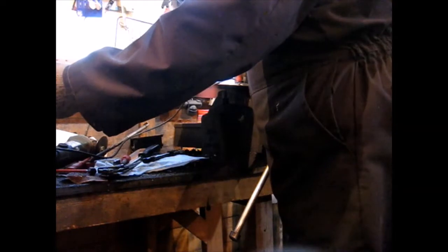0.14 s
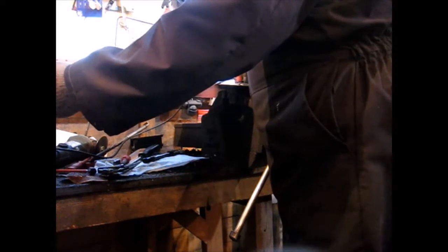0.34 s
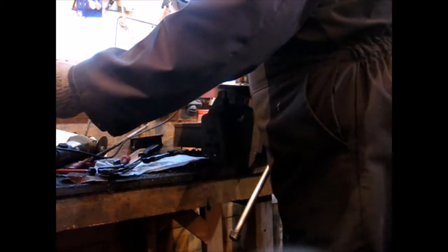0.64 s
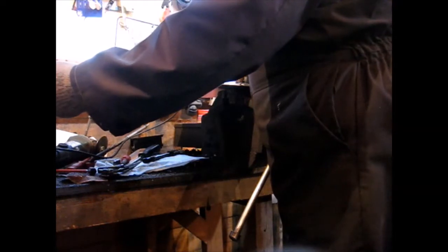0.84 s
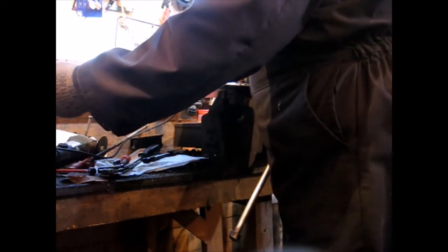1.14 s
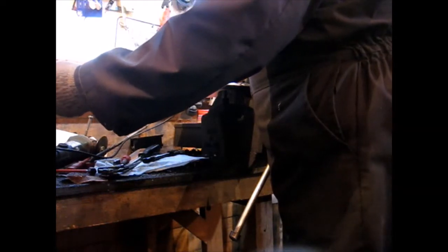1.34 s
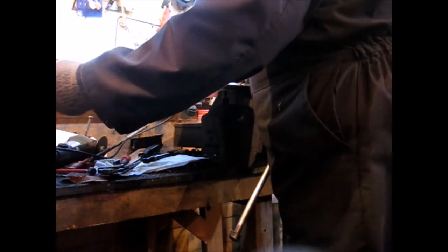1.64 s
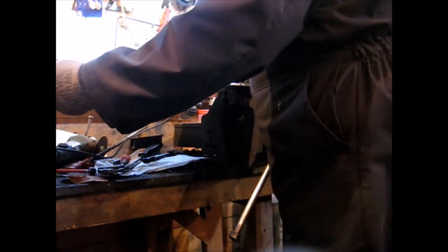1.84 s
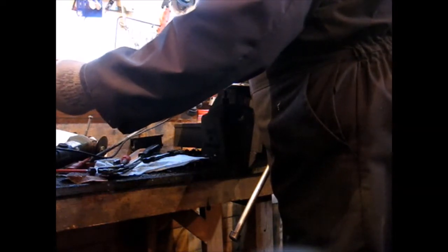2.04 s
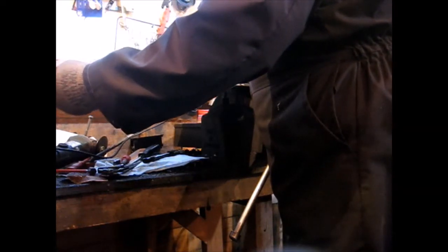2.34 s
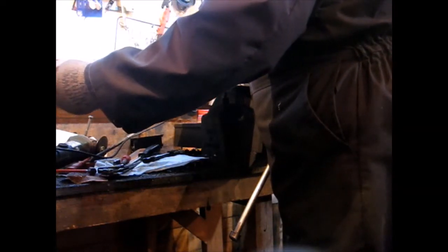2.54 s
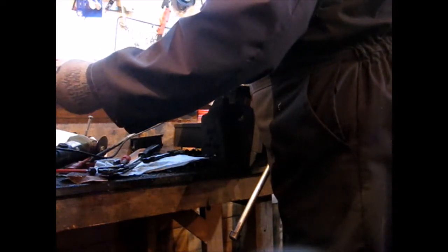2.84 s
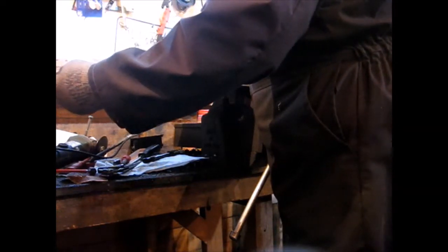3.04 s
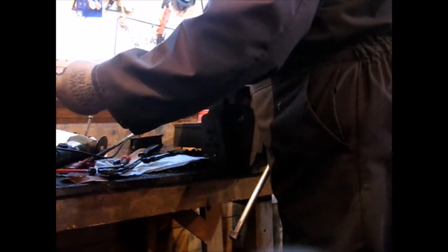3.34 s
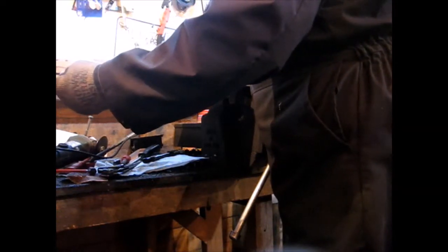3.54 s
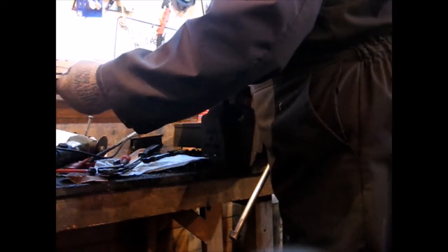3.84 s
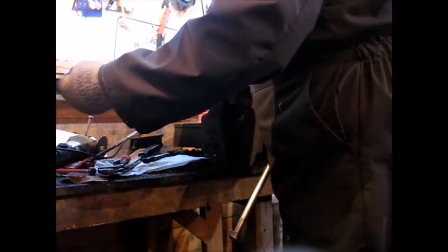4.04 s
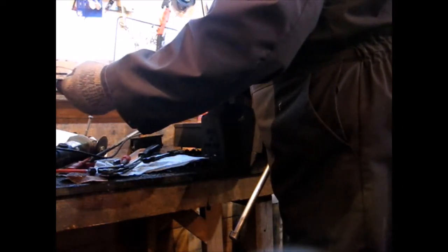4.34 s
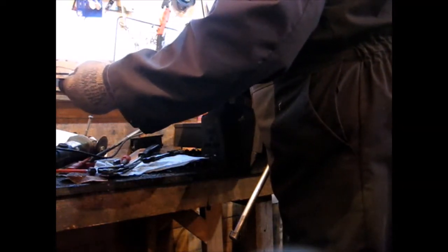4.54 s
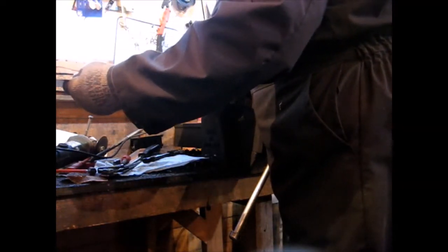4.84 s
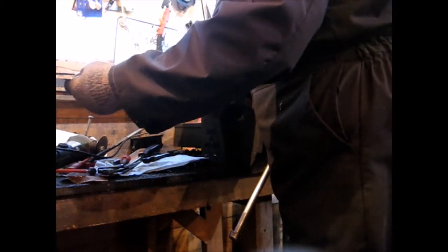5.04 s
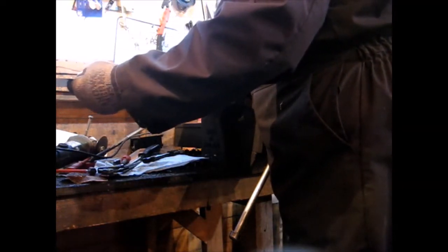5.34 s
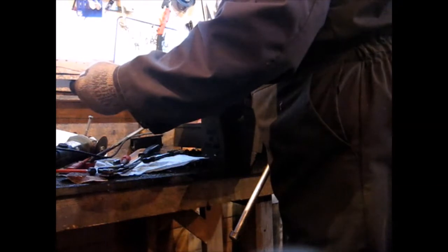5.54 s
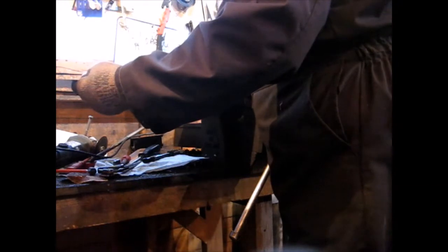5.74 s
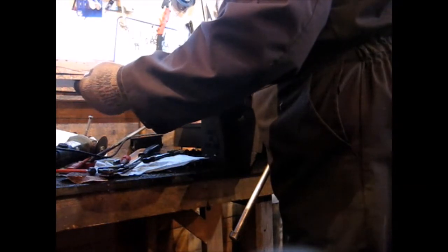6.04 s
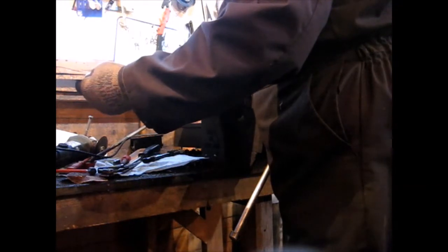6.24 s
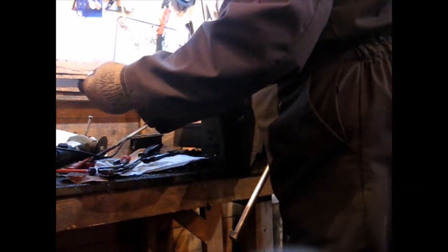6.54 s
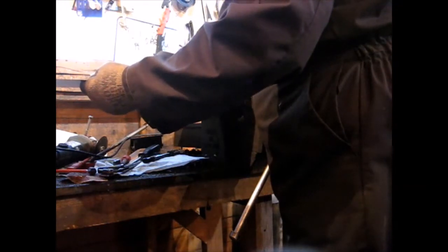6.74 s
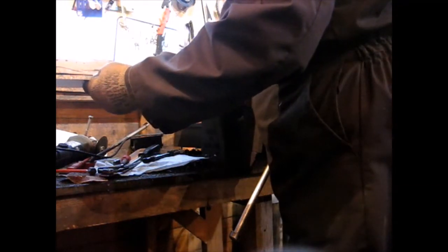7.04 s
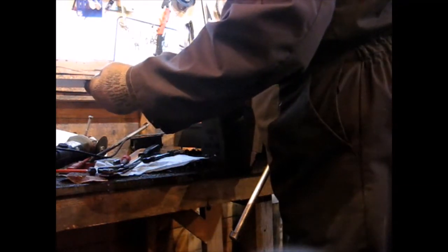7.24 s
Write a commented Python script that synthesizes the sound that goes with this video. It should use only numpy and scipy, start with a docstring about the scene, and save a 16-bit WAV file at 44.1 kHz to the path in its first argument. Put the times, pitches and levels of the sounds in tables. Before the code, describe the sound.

An electric jigsaw cuts sheet steel without stopping, heard close by in a small workshop. Its rapid strokes bite and scrape, making the metal ring brightly over a high gear whine. The motor labours and slows at first, then speeds up, and the whine rises and holds. Thin squeals come from the blade while the wooden bench rattles and hums faintly underneath.

```python
"""In a small workshop, an electric jigsaw cuts sheet steel on a wooden bench.
The motor labours, then speeds up as the push on the saw eases, and its gear whine rises with it.
On each stroke the teeth bite and make saw and sheet ring; the blade scrapes on its way back.
The blade also rasps and squeals in the slot, while the bench rattles and hums.
Now and then the noise drops away for a moment, leaving a few chirping tones."""
import sys
import numpy as np
from scipy import signal
from scipy.fft import rfft, irfft, next_fast_len
from scipy.io import wavfile
from scipy.ndimage import uniform_filter1d

SR = 44100
rng = np.random.default_rng(int(sys.argv[2]) if len(sys.argv) > 2 else 0)


def materialize(psi):
    """Save the field psi as 16-bit PCM at rate SR to the path in sys.argv[1].

    A 1-D psi becomes a single channel; in a 2-D psi each row is a channel.
    """
    bounded = np.clip(np.atleast_2d(psi).T, -1, 1)
    quanta = np.round(bounded * 32767).astype(np.int16)
    wavfile.write(sys.argv[1], SR, quanta)


N = 325892
T = np.arange(N) / SR

# How fast the motor drives the blade: time_s, strokes_per_s
STROKE_SPEED = [(0, 20.39), (.2, 19.75), (.56, 19.72), (.75, 18.77), (1.39, 18.31), (1.8, 17.15),
                (2.1, 17.92), (2.33, 19.8), (2.53, 20.6), (2.75, 21.6), (2.92, 22.4), (3.2, 22.45),
                (3.5, 22.94), (3.9, 22.73), (4.75, 22.4), (5.35, 22.72), (5.7, 22.58), (6.6, 22.69),
                (7.39, 22.97)]
# The tone colour of each noise, from low to high: pitch_hz, relative_db
BITE_COLOUR = [(200, -54), (900, -37), (1800, -33), (2300, -2), (2900, -5.5), (3500, 0), (4200, -13),
               (4900, -12.5), (7000, -32), (15000, -14.5)]
CHIP_COLOUR = [(500, -39), (2500, -24), (4500, 1), (6300, -17.5), (7800, 0), (9200, 1.5), (10200, -1.5),
               (11200, 2), (12300, -5.5), (14000, 2.5), (15800, -39)]
RASP_COLOUR = [(100, -66), (280, -62), (600, -12), (1200, -11.5), (1800, -1), (2700, 2), (3500, 4.5),
               (4700, 1.5), (5500, 1.5), (6600, 7), (7900, 2.5), (10000, -2), (14000, -5.5), (15800, -11.5)]
SCRAPE_COLOUR = [(200, -44.5), (600, -14), (900, -3), (1250, -3), (1700, -2.5), (2500, 3.5), (5000, -8),
                 (12000, -40)]
RATTLE_COLOUR = [(100, -39), (240, -30), (305, -5.5), (365, -3.5), (440, 2), (510, -2.5), (650, 2.5),
                 (850, 3.5), (1500, -0.5), (5000, -67)]
HUM_COLOUR = [(250, -30), (335, -10), (361, 0), (390, -6), (430, 3), (475, -10), (700, -13), (760, -1),
              (810, -14), (950, -30)]
ROOM_COLOUR = [(20, 0), (70, 1), (160, 3.5), (260, 4), (600, -20), (4000, -18.5)]
# The notes that saw and sheet ring at, and their relative levels in the four stages of the cut:
# pitch_hz, width_hz, stage1_db, stage2_db, stage3_db, stage4_db
STEEL_NOTES = [(1195, 43, -8, -11, -18, -16), (1277, 45, -11, -10, -9, -13), (1450, 62, -7, -13, -11, -11),
               (1634, 44, -7, -12, -13, -15), (1744, 39, -10, -7, -9, -10), (1989, 81, -6, -1, -3, -3),
               (2226, 53, -5, -6, -9, -8), (2395, 60, 2, -3, -6, -11), (2499, 33, -4, -13, -8, -6),
               (2663, 42, -2, -2, -1, -5), (2763, 34, -4, -1, -2, 0), (2927, 52, -2, -6, -4, -5),
               (3056, 57, -9, 2, -4, 1), (3112, 40, -5, -4, 2, 1), (3228, 44, 6, 0, -1, 3),
               (3384, 46, -3, -8, -2, -3), (3551, 44, 0, 3, 1, 0), (3623, 35, -10, -6, -6, -2),
               (3801, 54, -13, -1, -6, 0), (3982, 38, -8, -2, 2, 3), (4042, 45, -6, -2, 4, 4),
               (4142, 42, -4, 4, 3, 2), (4452, 54, -4, -9, -8, -11), (4633, 58, -7, -10, -9, -8),
               (5030, 41, -12, -8, -3, -4), (5103, 56, -3, -4, -5, -3), (5611, 54, -20, -15, -3, -2),
               (5768, 91, -7, -5, -4, -2), (5964, 58, -4, -6, -7, -5), (6121, 98, -6, -1, 1, 0),
               (6309, 78, -2, -4, -9, -15), (6607, 52, -11, -4, -4, -5), (6753, 50, -9, 0, -4, -5),
               (6897, 84, -5, -4, -4, 1), (7080, 69, -14, 1, -2, -5), (7191, 52, -6, -9, -7, -7),
               (7556, 59, -12, -8, -4, -2), (8411, 66, -8, -3, -5, -4), (8982, 62, -12, -6, -9, -5),
               (9235, 125, -9, -3, -12, -4)]
# When one stage blends into the next: start_s, end_s, three times in a row
STAGE_CHANGES = [2.2, 2.85, 3.9, 4.1, 5.65, 5.9]
# How much of a note's energy comes from the bite (the rest is rubbing): pitch_hz, share_0_to_1
BITE_SHARE = [(1500, .05), (2000, .55), (2400, .55), (2800, .55), (3150, .8), (4100, .87), (4900, .25),
              (7000, .15), (7600, .55), (9000, .65)]
# The tones of the gears: multiple_of_tooth_rate, loaded_db, unloaded_db
GEAR_TONES = [(2, -19, -27), (3, -12, -19), (4, 0, -9), (5, -15, -19), (6, -6, -8), (7, -9, -12),
              (8, -12, -16), (9, -10, -16)]
# The pitches that the gear case boosts: pitch_hz, width_hz, gain_db
GEAR_CASE = [(3240, 90, 0), (3550, 90, -1), (4150, 90, 3)]
# How loud the gears whine: time_s, level_db
WHINE_LEVEL = [(0.0, -37), (0.9, -34), (1.6, -34), (1.9, -31), (2.4, -31), (2.7, -33), (3.0, -32.5),
               (3.4, -36), (4.5, -40.5), (7.39, -41)]
# Squeals of the blade in the slot: start_s, length_s, pitch_hz, level_db
BLADE_SQUEALS = [(0.0, 1.25, 1186, -46), (1.0, 1.1, 1470, -47), (1.8, 1.15, 2400, -41),
                 (3.05, .75, 2768, -43), (3.25, .7, 6140, -42), (3.2, .8, 8410, -47), (4.35, .5, 5090, -47),
                 (4.5, 1.1, 1415, -49), (4.55, 1.55, 1972, -46), (5.15, .5, 5095, -41),
                 (5.6, 1.8, 2760, -45), (5.85, 1.5, 3215, -42), (6.3, 1.1, 3112, -42)]
# How hard the sheet shakes the bench: time_s, relative_db
SHEET_SHAKE = [(0.0, -59), (0.55, -56.5), (0.8, -60.5), (1.35, -55), (1.55, -58), (1.85, -55.5),
               (2.1, -58.5), (2.9, -57), (3.4, -60), (3.95, -57.5), (4.2, -61.5), (4.45, -61), (4.72, -53),
               (4.95, -56.5), (5.45, -51.5), (6.25, -53), (6.55, -57.5), (7.39, -56.5)]
# Moments when the noise drops away: time_s, depth_db
NOISE_DIPS = [(.572, 28), (.851, 28), (.905, 11), (1.225, 13), (1.31, 12), (1.437, 12), (1.76, 10),
              (2.01, 11), (2.203, 14), (2.55, 9), (2.85, 11), (2.995, 15), (3.17, 11), (3.326, 30),
              (3.698, 16), (3.847, 15), (4.082, 16), (4.19, 14), (4.255, 17), (4.402, 13), (4.468, 14),
              (4.808, 14), (4.95, 13), (5.063, 13), (5.17, 11), (5.715, 29), (5.767, 11), (5.812, 12),
              (6.066, 11), (6.13, 13), (6.972, 32), (6.995, 28), (7.25, 27)]
# How loud each noise is: base_db, extra_db_per_lost_stroke_per_s, extra_db_per_db_of_shake
BITE_RULE, RASP_RULE, SCRAPE_RULE = (-41, .14, -.21), (-32, -.13, .19), (-38.5, .37, .25)

FREE_STROKES_PER_S, USUAL_SHAKE_DB = 23, -57
FIRST_BITE_EXTRA_DB, SETTLE_S = 8.5, 1.7  # the teeth bite harder until the cut settles


def tooth_bite(strokes):
    """The teeth catch at the start of each cutting stroke and slam the sheet against the saw's base."""
    force = stroke_pulse(strokes, at=.9, rise=.044, fall=.12, uneven_db=3)
    return colour(force * grit(per_s=8400, spread_db=1.5), BITE_COLOUR)


def steel_ring(strokes):
    """Each bite pings the notes of the steel in a new mix; rubbing keeps them sounding in between."""
    force = stroke_pulse(strokes, at=.935, rise=.022, fall=.065, uneven_db=1)
    rubbing = grit(per_s=9000, spread_db=1) * amp(wander(2.1))  # the blade leans on the slot unevenly
    stroke_number = np.round(strokes + 1).astype(int)
    count = stroke_number[-1] + 1
    out = np.zeros(N)
    for hz, width, *stage_db in STEEL_NOTES:
        strength = amp(2.2 * rng.standard_normal(count))[stroke_number]
        phase = rng.random(count)[stroke_number]
        push = force * strength * np.cos(2 * np.pi * (hz * T + phase))
        rub = strength * np.roll(rubbing, rng.integers(N))
        struck = unit(resonate(push, hz, .75 * width))  # a freely ringing note is narrower
        rubbed = unit(resonate(resonate(rub, hz, width), hz, 2 * width))
        share = np.interp(hz, *np.transpose(BITE_SHARE))
        gain = np.interp(T, STAGE_CHANGES, np.repeat(amp(stage_db), 2)[1:-1])
        out += gain * (np.sqrt(share) * struck + np.sqrt(1 - share) * rubbed)
    return out


def chip_hiss(strokes):
    """Chips of steel tear off with a hiss on the cutting stroke."""
    tearing = stroke_pulse(strokes, at=.99, rise=.06, fall=.36, uneven_db=1.5)
    return colour(tearing * grit(per_s=10000, spread_db=-9), CHIP_COLOUR)


def blade_rasp():
    """The blade rubs in the slot all the time."""
    return colour(amp(1.4 * wander(78)) * grit(per_s=14000, spread_db=-.5), RASP_COLOUR)


def return_scrape(strokes):
    """The teeth drag over the edge as the blade comes back."""
    drag = stroke_pulse(strokes, at=.83, rise=.56, fall=.036, uneven_db=1.5)
    return colour(drag * grit(per_s=6000, spread_db=1.5), SCRAPE_COLOUR)


def gear_whine(strokes, teeth_per_stroke=45):
    """Slightly loose gears whine roughly, louder where a tone meets a pitch that their case boosts."""
    sag = -.021 * np.sin(2 * np.pi * (strokes - .27))  # the motor slows during each cut
    teeth = teeth_per_stroke * (strokes + sag / (2 * np.pi))
    teeth = teeth + .05 * wander(16) + .028 * wander(150)
    load = stroke_pulse(strokes, at=.02, rise=.08, fall=.35, uneven_db=1.5)
    tones = np.zeros(N)
    for multiple, loaded_db, unloaded_db in GEAR_TONES:
        gain = amp(loaded_db) * load + amp(unloaded_db)
        tones += gain * np.cos(2 * np.pi * (multiple * teeth + rng.random()))
    tones *= amp(2.2 * wander(200))
    case = sum(amp(db) * resonate(tones, hz, width) for hz, width, db in GEAR_CASE)
    return unit(tones + case)


def blade_squeals(fade_s=.088):
    """The blade sticks and slips in the slot, keeping a note singing unsteadily for a while."""
    out = np.zeros(N)
    for start, length, hz, db in BLADE_SQUEALS:
        fade = np.clip(np.minimum(T - start, start + length - T) / fade_s, 0, 1)
        tone = np.cos(2 * np.pi * (hz * T + .2 * wander(35))) * amp(3 * wander(40))
        out += amp(db) * fade * unit(tone)
    return out


def bench_rattle(strokes):
    """The shaking saw rattles the wooden bench."""
    shake = 1 + stroke_pulse(strokes, at=.94, rise=.21, fall=.13, uneven_db=3)
    return colour(shake * grit(per_s=3100, spread_db=2.5), RATTLE_COLOUR)


def bench_hum(strokes):
    """Even knocks on the bench make a wavering hum; the wood picks out some multiples of their rate."""
    phase = strokes + .006 * wander(5)
    knocks = sum(np.cos(2 * np.pi * (k * phase + rng.random())) for k in range(12, 44))
    return amp(-5 + 2 * wander(8)) * colour(knocks, HUM_COLOUR)


def plunger_throb(strokes, speed):
    """The rod holding the blade turns back twice a stroke: a faint low hum that grows with speed."""
    return amp(-74) * (speed / speed.max()) ** 4 * np.sin(4 * np.pi * strokes)


def noise_dips(x, random_per_s=1, random_depth_db=10):
    """The noise dips at listed and random moments, leaving chirping tones; deep dips last longer."""
    random_dips = [(s, random_depth_db) for s in T[rng.random(N) < random_per_s / SR]]
    gain = np.ones(N)
    for time_s, depth_db in NOISE_DIPS + random_dips:
        near = abs(T - time_s) < .04
        width_s = .004 + .00028 * depth_db
        gain[near] *= amp(-depth_db * np.exp(-((T[near] - time_s) / width_s) ** 2))
    # Only tones that stand well above the pitches around them sound through a dip.
    hz, _, spectrum = signal.stft(x, SR, nperseg=1024, noverlap=768)
    power = uniform_filter1d(abs(spectrum) ** 2, size=3, axis=1).clip(1e-20)
    standing_out = power / uniform_filter1d(power, size=45, axis=0).clip(1e-20)
    kept = np.clip(standing_out - 2.1, 0, 1) * ((hz > 1100) & (hz < 9800))[:, None]
    tones = signal.istft(spectrum * kept, SR, nperseg=1024, noverlap=768)[1][:N]
    return gain * x + (1 - gain) * amp(4.5) * tones


def add_echoes(x, echo_db, decay_s=.13):
    """Near walls and hard clutter throw back many quick echoes, mostly of the high pitches."""
    t = T[:SR // 2]
    echoes = rng.standard_normal(len(t)) * (rng.random(len(t)) < .08)
    echoes *= (t > .001) * amp(-60 * t / decay_s)
    echoes = signal.lfilter(*signal.butter(1, 900, "highpass", fs=SR), echoes)
    return x + amp(echo_db) * signal.oaconvolve(x, echoes / np.linalg.norm(echoes))[:N]


def room_tone():
    """The quiet, steady background noise of the workshop."""
    return amp(-70) * colour(rng.standard_normal(N), ROOM_COLOUR)


def stroke_pulse(strokes, at, rise, fall, uneven_db):
    """One peak a stroke, each of its own strength; at, rise and fall are fractions of a stroke."""
    since = (strokes - at) % 1
    shape = np.exp(-since / fall) + np.exp((since - 1) / rise)
    strength = np.interp(strokes - at + 2, np.arange(256), rng.standard_normal(256))
    return shape * amp(uneven_db * strength)


def grit(per_s, spread_db):
    """Random clicks of uneven size, like tiny breaks in the steel."""
    clicks = rng.standard_normal(N) * (rng.random(N) < per_s / SR)
    return unit(clicks * amp(spread_db * np.minimum(rng.exponential(1, N), 4)))


def resonate(x, hz, width_hz):
    """Makes a sound ring at one pitch; a smaller width rings longer."""
    r = np.exp(-np.pi * width_hz / SR)
    return signal.lfilter([1 - r, 0, r - 1], [1, -2 * r * np.cos(2 * np.pi * hz / SR), r * r], x)


def colour(x, table):
    """Gives a sound the tone colour in a table, at an average level of 1."""
    hz, db = np.transpose(table)
    grid_hz = abs(np.fft.fftfreq(4096, 1 / SR))
    log_gain = np.log(amp(np.interp(np.log(grid_hz + 1), np.log(hz), db)))
    response = np.fft.ifft(np.exp(np.conj(signal.hilbert(log_gain)))).real  # rings only after a click
    return unit(signal.oaconvolve(x, response[:len(response) // 2])[:N])


def wander(hz):
    """A smooth random wobble that changes about hz times a second."""
    size = next_fast_len(N, True)
    spectrum = rfft(rng.standard_normal(size)) / (1 + (np.fft.rfftfreq(size, 1 / SR) / hz) ** 4)
    return unit(irfft(spectrum, size)[:N])


def amp(db):
    """Turns decibels into a gain."""
    return 10 ** (np.asarray(db) / 20)


def unit(x):
    """Scales a signal to an average (rms) level of 1."""
    return x / np.sqrt(np.mean(x ** 2) + 1e-20)


def scene():
    """The saw's sounds follow its strokes; a shaking sheet rasps more and bites less."""
    speed = np.interp(T, *np.transpose(STROKE_SPEED))
    shake_db = np.interp(T, *np.transpose(SHEET_SHAKE))
    whine_db = np.interp(T, *np.transpose(WHINE_LEVEL))
    strokes = np.cumsum(speed) / SR - .221  # a running count of strokes
    lost_speed, extra_shake_db = FREE_STROKES_PER_S - speed, shake_db - USUAL_SHAKE_DB
    bite_db, rasp_db, scrape_db = (
        base_db + per_lost_speed * lost_speed + per_shake * extra_shake_db
        for base_db, per_lost_speed, per_shake in (BITE_RULE, RASP_RULE, SCRAPE_RULE))
    bite_db += FIRST_BITE_EXTRA_DB * np.exp(-T / SETTLE_S)
    chip_db = (bite_db + rasp_db) / 2 - 2.75
    tones = amp(whine_db) * gear_whine(strokes) + amp(-42) * steel_ring(strokes)
    tones += blade_squeals() + amp(shake_db) * bench_hum(strokes)
    noise = amp(bite_db) * tooth_bite(strokes) + amp(chip_db) * chip_hiss(strokes)
    noise += amp(rasp_db) * blade_rasp() + amp(scrape_db) * return_scrape(strokes)
    noise += amp(shake_db + 4.5) * bench_rattle(strokes)
    saw = add_echoes(tones, echo_db=-15) + add_echoes(noise, echo_db=-5)  # tones are heard more directly
    return (saw + plunger_throb(strokes, speed) + room_tone())[None]


def record(dry):
    """Adds the brief dips in the noise, then cuts off the very highest pitches."""
    treble_cut = signal.firwin(1023, 15850, window=("kaiser", 9), fs=SR)
    return signal.oaconvolve(noise_dips(dry[0]), treble_cut, "same")[None]


dry = scene()
out = record(dry)
materialize(out)
```